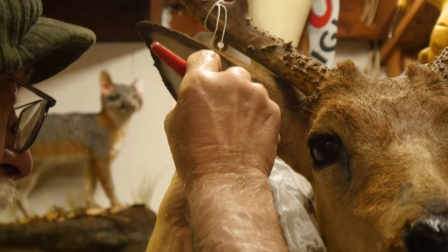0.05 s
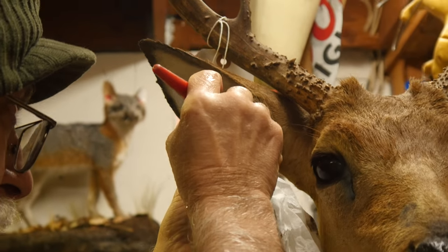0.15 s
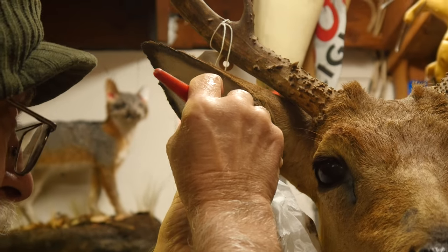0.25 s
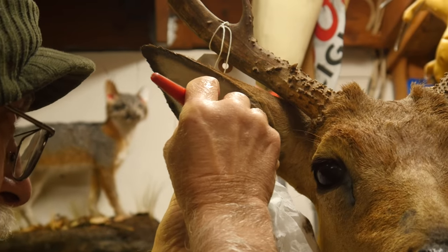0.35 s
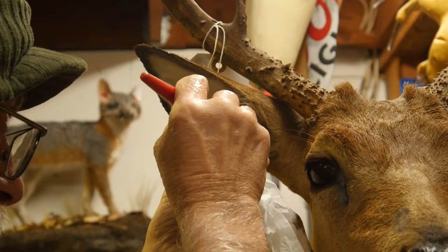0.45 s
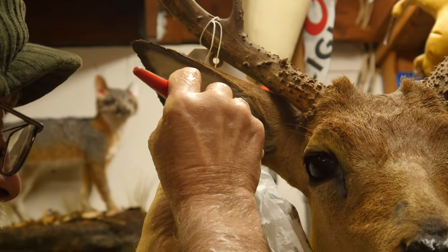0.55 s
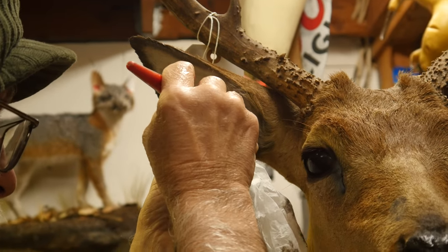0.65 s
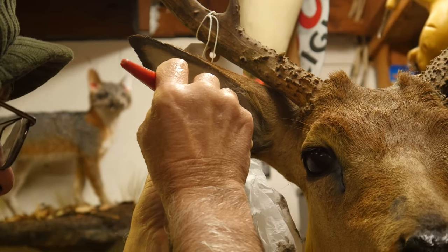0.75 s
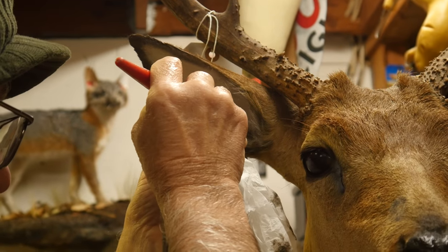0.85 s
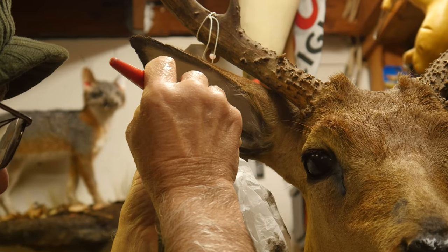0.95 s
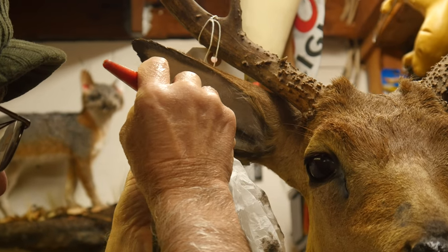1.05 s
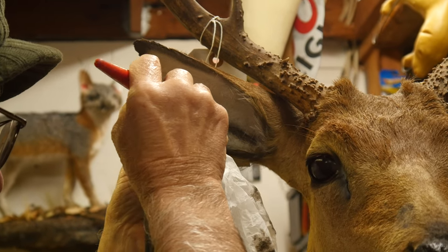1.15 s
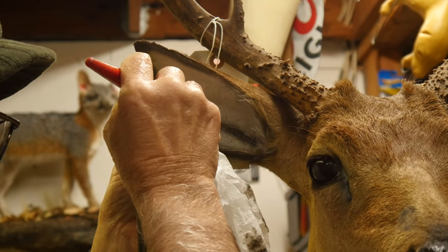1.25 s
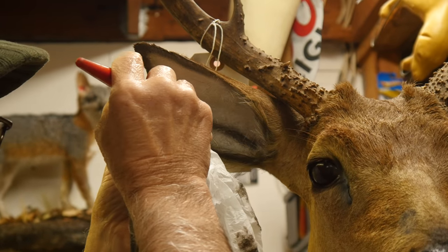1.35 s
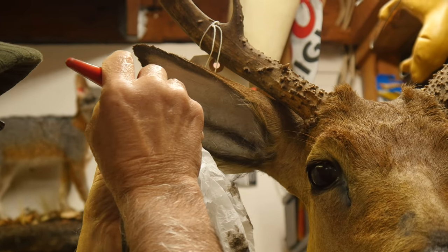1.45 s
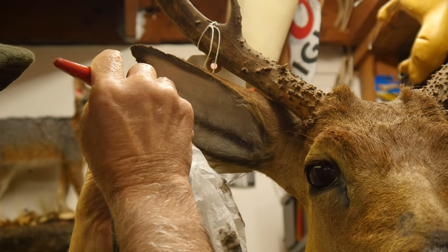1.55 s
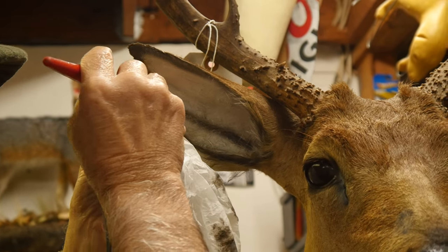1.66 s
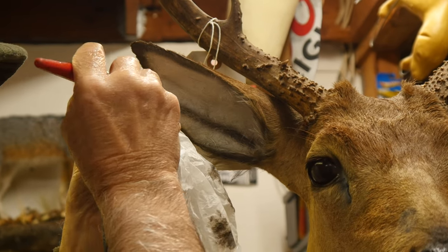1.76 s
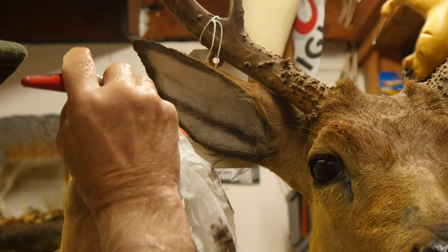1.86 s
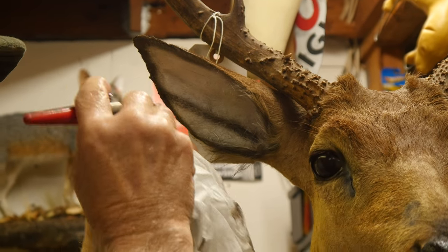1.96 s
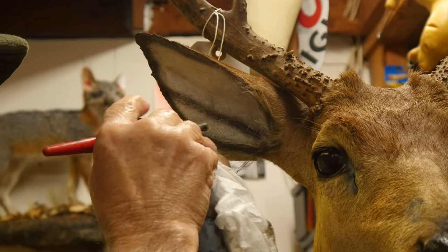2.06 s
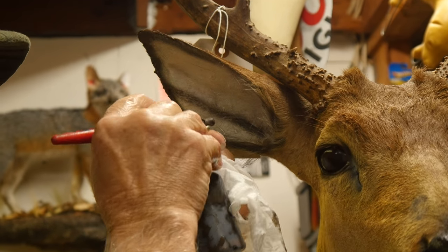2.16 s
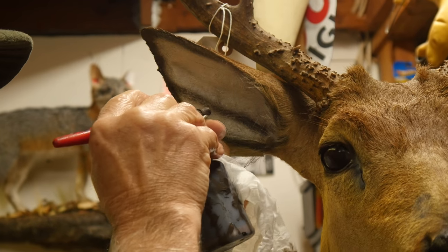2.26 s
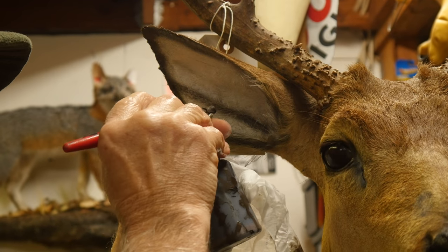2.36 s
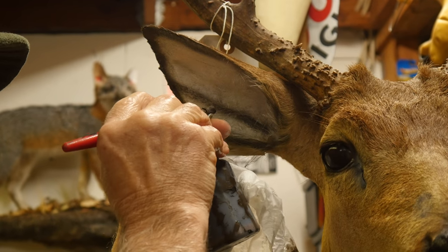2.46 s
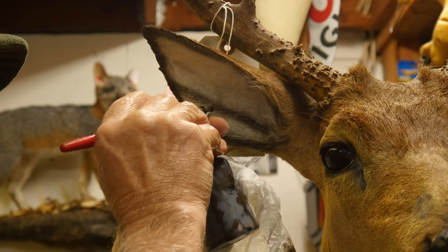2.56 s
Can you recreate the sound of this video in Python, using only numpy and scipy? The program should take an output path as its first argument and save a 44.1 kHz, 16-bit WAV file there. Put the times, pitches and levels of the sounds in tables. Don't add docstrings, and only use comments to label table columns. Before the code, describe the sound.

After faint hand bumps, pressurised air hisses from an airbrush for about a second and a half, washing louder over a cupped surface. It shuts sharply, the hand rustles and clicks, then spray restarts. Small room, close microphone, faint hum.

```python
import sys
import numpy as np
from scipy import signal
from scipy.fft import rfft, irfft, next_fast_len
from scipy.io import wavfile
from scipy.ndimage import uniform_filter1d, map_coordinates

SR = 44100
rng = np.random.default_rng(int(sys.argv[2]) if len(sys.argv) > 2 else 0)


def wav_out(sig):
    wavfile.write(sys.argv[1], SR, np.round(np.clip(np.atleast_2d(sig).T, -1, 1) * 32767).astype(np.int16))


def to_linear_factor(level_db):
    exponent = np.asarray(level_db, float) / 20
    return 10 ** exponent


N = 114660


def rms_one(x):
    return x / np.sqrt(np.mean(x ** 2) + 1e-20)


def in_time(rows):
    s, *columns = np.transpose(rows)
    return [np.interp(np.arange(N) / SR, s, c) for c in columns]


def drift(rate_hz):
    r = np.exp(-80 * np.pi * rate_hz / SR)
    slow = signal.lfilter([1], [1, -2 * r, r * r], rng.standard_normal(N // 40 + 2002))[2000:]
    return np.interp(np.arange(N) / 40, np.arange(len(slow)), rms_one(slow))


def colour(x, points):
    hz, db = np.array(points).T
    log_hz = np.log(np.fft.rfftfreq(N, 1 / SR) + 1)
    return rms_one(irfft(rfft(x) * to_linear_factor(np.interp(log_hz, np.log(hz), db)), N))


def turbulent(points, patchy_db, rate_hz):
    spectrum = rfft(colour(rng.standard_normal(N), points))
    together = drift(rate_hz)
    place = np.clip(3 * np.log2(np.fft.rfftfreq(N, 1 / SR) / 200 + 1e-9), 0, 20)
    out = 0
    for k in range(21):
        share = np.clip(1 - abs(place - k), 0, 1)
        flicker_db = patchy_db * (0.33 * together + drift(rate_hz) + 1.66 * drift(20))
        out = out + irfft(spectrum * share, N) * to_linear_factor(flicker_db)
    return rms_one(out)


def resonant(hz, width_hz):
    r = np.exp(-np.pi * width_hz / SR)
    a = [1, -2 * r * np.cos(2 * np.pi * hz / SR), r * r]
    once = signal.lfilter([1, 0, -1], a, rng.standard_normal(N))
    return rms_one(signal.lfilter([1, 0, -1], a, once))


def gliding(hz, width_hz):
    r = np.exp(-np.pi * width_hz / SR)
    a, b = signal.lfilter([1], [1, -2 * r, r * r], rng.standard_normal((2, N)))
    phase = 2 * np.pi * np.cumsum(hz) / SR
    highpass = signal.butter(4, 650, "high", fs=SR, output="sos")
    return rms_one(signal.sosfilt(highpass, a * np.cos(phase) + b * np.sin(phase)))


def knocks(rows, t60_s):
    out = np.zeros(N + SR)
    t = np.arange(SR // 10) / SR
    for s, db, hz in rows:
        start = int(s * SR)
        out[start:start + len(t)] += to_linear_factor(db - 60 * t / t60_s) * np.sin(2 * np.pi * hz * t)
    return out[:N]


def dip(x, hz, width_hz, share):
    return x - np.clip(share, 0, 1) * signal.lfilter(*signal.iirpeak(hz, hz / width_hz, fs=SR), x)


def band(x, low_hz, high_hz):
    size = next_fast_len(N + 2048)
    hz = np.fft.rfftfreq(size, 1 / SR)
    edge = np.clip(np.minimum(hz - low_hz + 60, high_hz + 60 - hz) / 120, 0, 1)
    return irfft(rfft(x, size) * np.sin(np.pi / 2 * edge) ** 2, size)[:N]


# (frequency [Hz], level [dB rms])
HUM = [(240, -91.5), (360, -79.5), (479.1, -68.5), (721, -81.5)]
# (multiple of shaft speed, level [dB rms])
MOTOR = [(1, -82), (2, -74.5), (3, -75.5), (4, -73.5), (5, -97), (6, -78), (7, -90), (8, -81)]
MOTOR_HZ = 29.6
# (frequency [Hz], density [dB/Hz])
FLOOR = [(13, -2), (22, -2.5), (45, -32), (250, -25.5), (900, -27), (3300, -30), (6000, -35),
         (15000, -31.5)]
FLOOR_DB = -55.5


def background():
    t = np.arange(N) / SR
    lines = list(HUM) + [(k * MOTOR_HZ, db) for k, db in MOTOR]
    hum = 0
    for hz, db in lines:
        level = to_linear_factor(db + 0.2 * drift(11.0))
        hum = hum + level * np.sqrt(2) * np.sin(2 * np.pi * (hz * t + rng.random()))
    return to_linear_factor(FLOOR_DB) * turbulent(FLOOR, patchy_db=1.2, rate_hz=8.7) + hum


ROOM_T60_S, ROOM_TOP_T60_S, ROOM_DB = 0.28, 0.22, -11.5


def room(x):
    t = np.arange(SR // 2) / SR
    noise = rng.standard_normal(len(t)) * np.clip(t / 0.0042, 0, 1)
    low = signal.sosfilt(signal.butter(2, 7000, fs=SR, output="sos"), noise)
    late = rfft(noise * to_linear_factor(-60 * np.maximum(t, .03) / ROOM_T60_S))
    smooth_power = uniform_filter1d(uniform_filter1d(abs(late) ** 2, size=120), size=120)
    noise, low = irfft(rfft([noise, low]) / np.sqrt(smooth_power), len(t))
    tail = low * to_linear_factor(-60 * t / ROOM_T60_S) + 0.95 * (noise - low) * to_linear_factor(-60 * t / ROOM_TOP_T60_S)
    return to_linear_factor(ROOM_DB) * signal.fftconvolve(x, tail / np.sqrt(np.sum(tail ** 2)))[:N]


# (time [s], level [dB])
SETTLE = [
    (0.0, -51),
    (0.008, -58.5),
    (0.146, -55.5),
    (0.15, -96),
]
# (frequency [Hz], width [Hz], level [dB])
SETTLE_HZ = [(3270, 730, -4), (260, 110, -7.5), (5240, 1400, -10.5), (1730, 1100, -8.5)]


def settling():
    level_db, = in_time(list(SETTLE) + [(SETTLE[-1][0] + .05, -80)])
    rub = sum(to_linear_factor(db + 0.72 * drift(25)) * resonant(hz, width) for hz, width, db in SETTLE_HZ)
    return to_linear_factor(level_db) * rub


# (time [s], level [dB])
RUSTLE = [(1.88, -56.5), (1.952, -58), (2.0, -53), (2.085, -52), (2.1, -60), (2.16, -58.5), (2.172, -57),
          (2.19, -58), (2.2, -61), (2.302, -66), (2.312, -57), (2.36, -61), (2.44, -67.5), (2.54, -68.5)]
# (frequency [Hz], density [dB/Hz])
RUSTLE_HZ = [(900, -7), (1900, -4), (2700, -5.5), (3500, -0.5), (5000, -12.5), (9000, -27)]
GRAINS_PER_S = 7500


def rustle():
    fade_in = (RUSTLE[0][0] - .06, -75)
    fade_out = (RUSTLE[-1][0] + 0.038, -75)
    level_db, = in_time([fade_in] + list(RUSTLE) + [fade_out])
    sizes = to_linear_factor(2.2 * np.minimum(rng.exponential(1, N), 4)) * rng.choice([-1, 1], N)
    hits = rng.random(N) < GRAINS_PER_S * to_linear_factor(3 * drift(30)) / SR
    return to_linear_factor(level_db) * colour(sizes * hits + 0.21 * rng.standard_normal(N), RUSTLE_HZ)


# (time [s], peak [dB], pitch [Hz], second mode [dB re first])
TICKS = [(1.943, -42, 2070, -8), (1.9734, -53, 3650, -12), (2.076, -46, 3600, -9), (2.091, -47, 1800, -3),
         (2.127, -46, 2050, -12), (2.143, -45, 1700, -4), (2.169, -48, 3300, -3), (2.1753, -43, 3440, -12),
         (2.18, -47, 3600, -12), (2.184, -48, 1820, -2), (2.3108, -49, 3020, -12), (2.3475, -43, 2150, 0),
         (2.3843, -42.5, 1920, -5), (2.406, -46, 2000, 0), (2.429, -41.5, 3300, -11),
         (2.4428, -40.5, 3080, -3), (2.478, -50.5, 3080, -9.5)]
TICK_T60_S = .009
# (time [s], level [dB], pitch [Hz])
BUMPS = [(0.028, -46.5, 330), (.044, -41.5, 135), (0.033, -50.5, 223), (.042, -49, 98), (.085, -48, 174),
         (.095, -51, 313), (.14, -49, 280), (0.00086, -53, 705), (0.024, -51, 670), (.045, -54, 680)]
BUMP_T60_S = 0.084


def hand():
    first = [row[:3] for row in TICKS]
    second = [(s, db + re_db, 5200 - hz) for s, db, hz, re_db in TICKS]
    ticks = knocks(first + second, TICK_T60_S)
    settle = settling()
    return rustle() + settle + ticks + knocks(BUMPS, BUMP_T60_S)


LEAK_S, LEAK_LEN_S, LEAK_HZ, LEAK_DB = .095, .1, 1405, -57
SEEP_S, SEEP_RISE_S, SEEP_DB = 2.54, .018, -60.5
# (frequency [Hz], width [Hz], level [dB])
SEEP_HZ = [(5400, 500, -11), (8200, 500, -3), (10500, 870, 2), (13800, 600, -5)]


def valve_leak():
    t = np.arange(N) / SR
    swell = np.sin(np.pi * np.clip((t - LEAK_S) / LEAK_LEN_S, 0, 1)) ** .5
    whistle = np.sin(2 * np.pi * LEAK_HZ * t + .5 * drift(8.7))
    seep = sum(to_linear_factor(db) * resonant(hz, width) for hz, width, db in SEEP_HZ)
    rise = np.clip((t - SEEP_S) / SEEP_RISE_S, 0, 1)
    return to_linear_factor(LEAK_DB) * swell * whistle + to_linear_factor(SEEP_DB) * rise * seep


# (frequency [Hz], width [Hz], level [dB re main whistle])
WHISTLES = [(4306, 210, -10.5), (2186, 110, -8)]
WHISTLE_WIDTH_HZ, LOW_MODE_WIDTH_HZ = 360, 790
RIM_HZ, RIM_WIDTH_HZ, RUMBLE_HZ, RUMBLE_WIDTH_HZ = 4210, 1660, 323, 730


def hollow(low_db, whistle_db, rim_db, rumble_db, low_hz, whistle_hz):
    whistles = to_linear_factor(1.1 * drift(42)) * gliding(whistle_hz, WHISTLE_WIDTH_HZ)
    for hz, width, db in WHISTLES:
        whistles = whistles + to_linear_factor(db + 1.1 * drift(42)) * resonant(hz, width)
    return (to_linear_factor(low_db) * gliding(low_hz, LOW_MODE_WIDTH_HZ) + to_linear_factor(whistle_db) * rms_one(whistles)
            + to_linear_factor(rim_db) * resonant(RIM_HZ, RIM_WIDTH_HZ)
            + to_linear_factor(rumble_db) * resonant(RUMBLE_HZ, RUMBLE_WIDTH_HZ))


CAP_HZ, CAP_WIDTH_HZ = 8050, 550
LOBE_WIDTHS_HZ = [3100, 1400]


def nozzle_lobes(cap_db, lobe_db, lobe_hz):
    lobes = to_linear_factor(cap_db) * resonant(CAP_HZ, CAP_WIDTH_HZ)
    for db, hz, width in zip(lobe_db, lobe_hz, LOBE_WIDTHS_HZ):
        lobes = lobes + to_linear_factor(db) * gliding(hz, width)
    return lobes


# (time [s], nozzle hiss [dB], surface wash [dB],
#              cavity whistle [dB re wash], rim hump [dB re wash], paint rumble [dB re wash])
SPRAY = [(0.155, -57, -62, -6, 4, -14), (0.184, -38.5, -44, -3, -15, -13), (0.26, -33.5, -30.5, 0, -7, -27),
         (0.328, -33, -30, 4, -6.5, -25), (0.422, -32, -33, -4.5, -7, -19.5),
         (0.466, -27.5, -29, 0.5, -5.5, -23), (0.58, -29, -31.5, -2, 0, -20.5),
         (0.724, -31.5, -35.5, -2, -0.5, -19), (0.898, -26.5, -31.5, -7.5, 1.5, -23),
         (1.202, -28, -29.5, -11, -2, -20.5), (1.216, -25.5, -25.5, -20, -6, -18),
         (1.416, -25.5, -25.5, -9, -13, -18.5), (1.47, -26, -22, -11, -23.5, -18),
         (1.6, -28, -16.5, -19.5, -22, -23), (1.63, -26, -15.5, -21, -30.5, -27.5),
         (1.67, -30, -13.5, -27, -30, -24.5), (1.746, -25.5, -18, -28.5, -28, -25.5),
         (1.752, -28.5, -16, -10, -37, -24.5)]
# (time [s], nozzle hiss [dB], wash [dB])
NEXT = [
    (2.54, -76, -75),
    (2.584, -50.5, -66.5),
    (2.589, -33.5, -47),
    (2.6, -24, -36),
]
SHUT_DB_PER_S, OPEN_DB_PER_S = 652, 900
# (frequency [Hz], density [dB/Hz])
NOZZLE = [(700, -42.5), (2500, -13), (5000, 0), (6400, -1), (9000, -0.5), (11500, 0), (14500, 3.5),
          (15900, 2.5)]
# (frequency [Hz], density [dB/Hz])
WASH = [(120, -85), (700, -19), (1450, -7), (1950, -5), (2900, -0.15), (3700, -3.5), (4600, -15),
        (8000, -18.5)]
# (time [s], cap ring, middle lobe, top lobe [dB re hiss], low cavity mode [dB re wash])
TURN = [(.17, -7, -1, -1, 2), (.3, -18, -6.5, -5, -1.5), (.45, -15, -6.5, -19, -1.5),
        (.6, -11.5, -7, -22, -2.5), (.74, -13, -5, -7, -2), (.9, -27, -19, -10, -7.5),
        (1.05, -11, -10, -30, -6.5), (1.2, -17, -9, -17, -5), (1.35, -50.5, -7.5, -16, -7.5),
        (1.5, -37, -7, -7, -6.5), (1.63, -20, -5, -6, -10), (1.75, -18, -17, -7, -16)]
# (time [s], low cavity mode [Hz], main whistle [Hz], middle lobe [Hz], top lobe [Hz])
GLIDE = [(.2, 1550, 3225, 11660, 14080), (.37, 1646, 3182, 11350, 14040), (.52, 1549, 3330, 12700, 15500),
         (.7, 1555, 3405, 10410, 14150), (.9, 1447, 2972, 9200, 13800), (1.1, 1501, 3000, 11300, 15400),
         (1.3, 1324, 2950, 10960, 13870), (1.47, 1250, 2674, 11100, 14720),
         (1.65, 1392, 2860, 12100, 15500)]


def spray():
    t = np.arange(N) / SR
    jet_db, wash_db, whistle_db, rim_db, rumble_db = in_time(SPRAY)
    jet2_db, wash2_db = in_time(NEXT)
    cap_db, *lobe_db, low_db = in_time(TURN)
    low_hz, whistle_hz, *lobe_hz = in_time(GLIDE)
    shut_db = -SHUT_DB_PER_S * np.maximum(t - SPRAY[-1][0], 0)
    valve_db = shut_db - OPEN_DB_PER_S * np.maximum(SPRAY[0][0] - t, 0)
    again_db = -OPEN_DB_PER_S * np.maximum(NEXT[0][0] - t, 0)
    jet = to_linear_factor(jet_db + valve_db) + to_linear_factor(jet2_db + again_db)
    cavity = hollow(low_db, whistle_db, rim_db, rumble_db, low_hz, whistle_hz)
    lobes = nozzle_lobes(cap_db, lobe_db, lobe_hz)
    wash = turbulent(WASH, patchy_db=-0.5, rate_hz=4.6)
    leak = valve_leak()
    hiss = turbulent(NOZZLE, patchy_db=-1.26, rate_hz=10.4)
    first_wash = to_linear_factor(wash_db + valve_db - 3.0) * (wash + cavity)
    second_wash = to_linear_factor(wash2_db + again_db) * (wash + 0.44 * resonant(1000, 1000))
    return jet * (hiss + lobes) + first_wash + second_wash + leak


HAND_ECHO_S, HAND_SWAY_S, HAND_ECHO_DB = 0.001056, .00008, -24.5
# (time [s], dip share 0-1 by bench, ear rim, knuckles, thumb)
SHADE = [(.2, .1, 0.37, .3, .1), (.5, 0.17, 0.57, 0.26, 0.041), (.7, 0.19, 0.39, .15, .05),
         (.9, 0.35, 0.39, .05, 0.17), (1.15, 0.88, 0.26, 0.35, .05), (1.25, .6, 0.046, 0.17, 0.085),
         (1.45, 0.56, .02, 0.23, .45), (1.6, 0.68, .02, 0.33, 0.57), (1.75, 0.32, .02, .3, .4)]
# (frequency [Hz], width [Hz])
DIPS = [(1920, 370), (6400, 1160), (9100, 670), (10100, 710)]


def reflections(x):
    lag = SR * (HAND_ECHO_S + HAND_SWAY_S * drift(2.0))
    x = x + to_linear_factor(HAND_ECHO_DB) * map_coordinates(x, [np.arange(N) - lag], order=1)
    for share, (hz, width) in zip(in_time(SHADE), DIPS):
        x = dip(x, hz, width, share)
    return x


SIDE_DB, SIDE_HZ = -87, 450
MIC_DIP_HZ, MIC_DIP_WIDTH_HZ, MIC_DIP_SHARE = 13400, 800, 0.18


def scene():
    jet = spray()
    touch = hand()
    side = to_linear_factor(SIDE_DB) * resonant(SIDE_HZ / 3, SIDE_HZ)
    heard = reflections(jet) + touch + room(jet + touch) + background()
    return dip(heard, MIC_DIP_HZ, MIC_DIP_WIDTH_HZ, MIC_DIP_SHARE) + side * [[1], [-1]]


def top_cut(x):
    return signal.sosfilt(signal.butter(12, 16760, fs=SR, output="sos"), x)


CUTOFF_HZ = 15800
# (time [s], low edge [Hz], high edge [Hz])
FILLS = [(.553, 5000, 7700), (.553, 8900, 10500), (.692, 14400, 15800), (.738, 5000, 7700),
         (.738, 13000, 15800), (.995, 13700, 15800), (1.017, 8200, 11100), (1.179, 5700, 7000),
         (1.179, 8900, 11100), (1.318, 4500, 8300), (1.318, 13000, 14500), (1.551, 7000, 8300),
         (1.574, 4200, 5200), (1.644, 5200, 6400), (1.644, 8900, 10500)]
FILL_LEN_S, FILL_DB = 1024 / SR, -5


def record(dry):
    out = np.array([band(c, -SR, CUTOFF_HZ) for c in dry])
    mid, t = out.mean(axis=0), np.arange(N) / SR
    for s, low_hz, high_hz in FILLS:
        window = np.cos(np.pi / 2 * np.clip(2 * abs(t - s) / FILL_LEN_S - .7, 0, 1))
        unlike = np.roll(band(mid, low_hz, high_hz), 900)
        out = out + to_linear_factor(FILL_DB) * window * unlike * [[1], [-1]]
    return top_cut(out)


dry = scene()
out = record(dry)
wav_out(out)
```